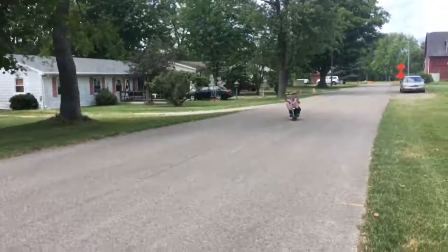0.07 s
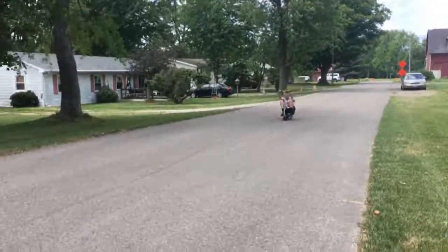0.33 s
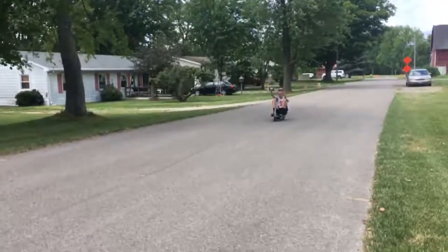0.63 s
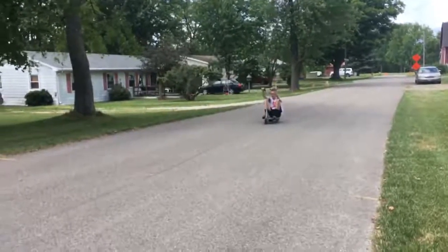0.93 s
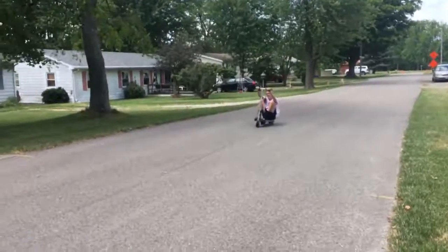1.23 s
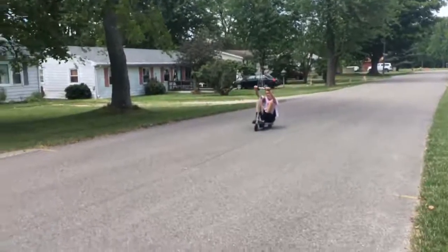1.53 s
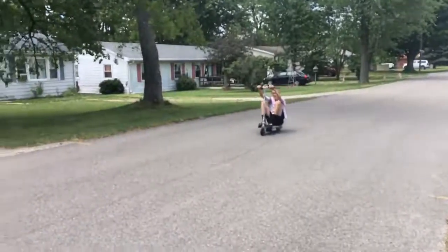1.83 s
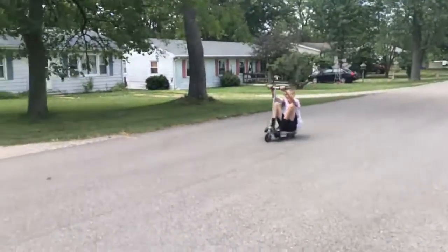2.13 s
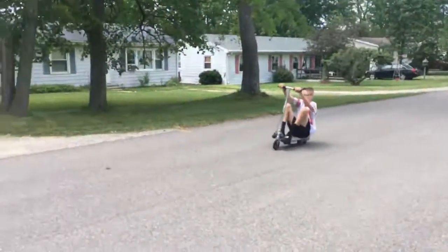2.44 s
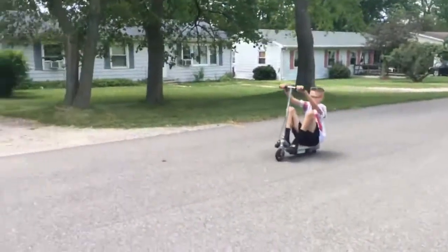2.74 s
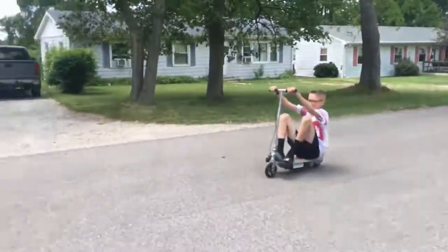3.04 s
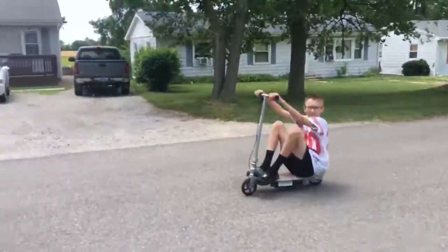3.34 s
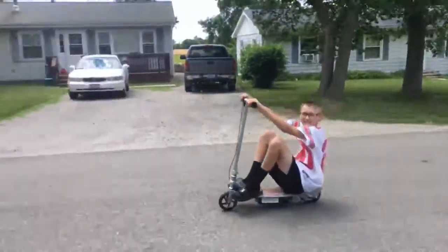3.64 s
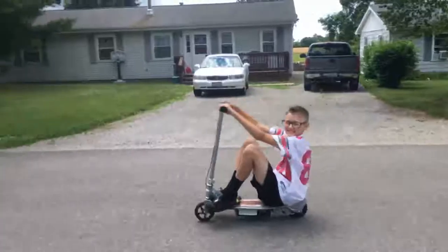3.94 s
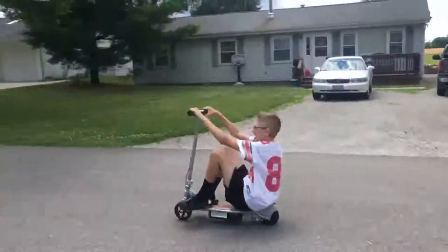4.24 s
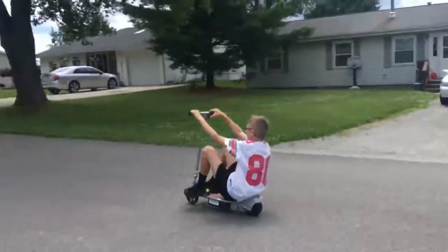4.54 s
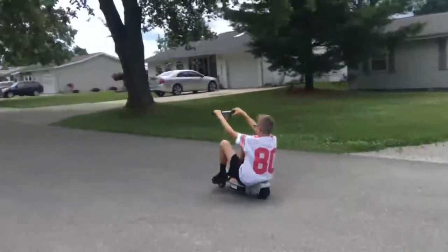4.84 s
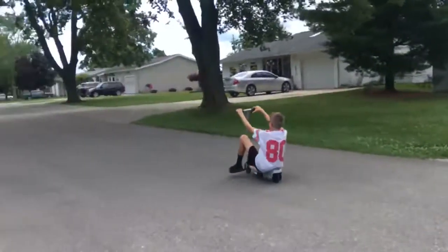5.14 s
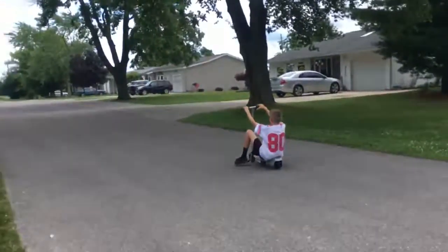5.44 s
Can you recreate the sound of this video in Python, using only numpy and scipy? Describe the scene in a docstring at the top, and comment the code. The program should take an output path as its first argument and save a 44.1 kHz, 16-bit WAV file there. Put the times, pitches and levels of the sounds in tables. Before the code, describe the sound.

A small electric scooter whines and hisses past on a paved street while gusty wind rumbles on the microphone.

```python
"""Electric scooter passing in the wind

A small chain-driven scooter rides along a quiet paved street, nearest at about 4.2 s. Its sprocket
whines at the tooth rate, the chain sizzles, the tyres hiss on the asphalt and the deck rings.
Gusts rumble and flutter on the microphone, and the hand-held recorder is bumped a few times."""
import sys
import numpy as np
from scipy import signal
from scipy.fft import rfft, irfft, next_fast_len
from scipy.io import wavfile
from scipy.ndimage import uniform_filter1d, map_coordinates

SR = 44100
rng = np.random.default_rng(int(sys.argv[2]) if len(sys.argv) > 2 else 0)


def to_wav(sig):
    """Store sig (one row per channel, or 1-D mono) as 16-bit WAV at the path in sys.argv[1].

    Samples outside -1..1 are clipped; the rate is SR.
    """
    pcm = np.clip(np.atleast_2d(sig), -1, 1) * 32767
    pcm = np.round(pcm).astype(np.int16)
    wavfile.write(sys.argv[1], SR, pcm.T)  # frames by channels


N = 250929
TIME = np.arange(N) / SR

# Tone of the street bed. Each row: frequency in Hz, relative level in dB.
STREET_EQ = [(100, -14), (400, 3), (650, 0), (950, 1.5), (1450, -1.5), (1800, -6.5), (2200, -0.5),
             (2800, -9), (4100, -5.5), (4900, -13.5), (6200, -8), (10000, -17), (15800, -15)]
# Finger bumps on the case. Each row: start in seconds, level in dB, seconds to fall 60 dB, low-pass in Hz.
BUMPS = [(0.912, -35, 0.071, 900), (1.093, -40, 0.038, 900), (1.25, -37, 0.55, 1500),
         (1.264, -26, 0.051, 3800), (4.582, -39, 0.059, 9000), (5.349, -33, 0.022, 11200),
         (5.358, -39.5, 0.21, 3970), (5.371, -40, .02, 12950)]
# Resonances of the case. Each row: frequency in Hz, width in Hz, level in dB.
CASE_MODES = [(657, 54, -2), (980, 380, 3), (1330, 120, -5), (1940, 210, -4.5), (2720, 880, -5.5),
              (3680, 320, -12), (6040, 1000, -4.5), (8100, 3000, -18), (12100, 10000, 7.5)]

# Tone of the large, middling and small eddies. Each row: frequency in Hz, relative level in dB.
RUMBLE_EQ = [(15, -44), (28, -10), (45, -1), (72, 1.5), (100, -3.5), (140, -10.5), (240, -39)]
BUFFET_EQ = [(65, -12), (115, -0.5), (175, 1.5), (270, -3.5), (370, -12.5), (500, -18), (700, -29),
             (1500, -49)]
FLUTTER_EQ = [(180, 3), (320, 4.5), (480, 3.5), (680, 0), (1050, -8), (1500, -17), (2100, -34), (3500, -58),
              (7000, -74)]
# Faster air sheds smaller eddies and lifts the rumble. Each row: time in seconds, shift in octaves.
RUMBLE_BEND = [(0, .2), (2.1, .4), (2.6, 0.017), (3.8, -.15), (5.3, .25)]
# The breeze between gusts. Each row: time in seconds, rumble level in dB, buffet level in dB.
BREEZE = [(0, -35.5, -39.5), (.55, -36.5, -35.5), (.95, -41, -40.5), (1.5, -34, -37), (2.35, -39, -28.5),
          (2.95, -39.5, -29), (3.4, -29, -25), (4.0, -28, -38), (4.22, -28, -43), (4.45, -20.5, -30.5),
          (4.8, -22, -30), (5.28, -30, -28), (5.69, -26.5, -23.5)]
# Gusts. Each row: start in seconds, length in seconds, then rumble, buffet and flutter levels in dB.
GUSTS = [(0.051, 0.027, -30, -31, -43), (0.384, 0.043, -32.5, -36.5, -60), (.71, 0.029, -33.5, -33, -52),
         (1.235, 0.05, -36, -27, -42), (1.669, 0.023, -29, -21, -46), (1.714, 0.031, -34, -22, -45),
         (1.845, 0.097, -19.5, -22, -40), (1.976, 0.13, -21.5, -21, -54), (2.148, 0.12, -31, -28, -49),
         (2.251, 0.21, -39, -40, -38.5), (2.484, 0.13, -26, -30, -32), (2.635, 0.055, -21.5, -33, -25),
         (2.749, .045, -24, -19, -37), (2.845, .033, -21, -27, -20), (2.894, 0.038, -44, -39, -32),
         (2.999, 0.16, -32, -32, -31), (3.201, 0.034, -37, -29, -29), (3.235, 0.028, -39, -24, -23),
         (3.276, 0.088, -25, -28, -21), (3.465, 0.072, -31, -21.5, -21), (3.554, .05, -22, -28, -22),
         (3.649, .02, -20.5, -19, -27.5), (3.751, 0.0144, -20.5, -22, -28),
         (3.895, 0.017, -14.5, -26.5, -39.5), (4.072, 0.069, -24, -36.5, -45),
         (4.27, 0.089, -15.5, -22, -36), (4.384, .045, -29, -20, -30.5), (4.541, 0.017, -24.5, -20, -26.5),
         (4.853, 0.0625, -16.5, -20, -36), (4.931, .026, -13.5, -13.5, -20),
         (4.976, 0.054, -24, -20, -29.5), (5.044, 0.061, -15, -16.5, -23), (5.119, 0.061, -13, -15, -18.5),
         (5.202, 0.044, -33, -19, -31), (5.318, 0.08, -24.5, -26.5, -36.5),
         (5.439, .07, -20.5, -24.5, -31.5), (5.519, 0.047, -25, -19, -24),
         (5.618, 0.042, -24, -22.5, -35.5)]
# Lone eddies on the microphone.
# Each row: start in seconds, level in dB, pitch in Hz, seconds to fall 60 dB.
SLAPS = [(.945, -26.5, 183, 0.089), (1.722, -13.5, 156, 0.073), (1.898, -12.5, 169, 0.11),
         (2.425, -13, 505, 0.017), (2.641, -11.5, 654, 0.019), (2.670, -4.5, 605, 0.0058),
         (2.852, -10.5, 502, 0.053), (3.052, -20, 493, 0.0075), (3.090, -10, 596, 0.009),
         (3.282, -3, 529.8, 0.0078), (3.325, -5, 1397, 0.0032), (3.4736, -1.5, 287, 0.013),
         (3.559, -11.5, 320, 0.18), (3.574, -1, 910, 0.0024), (3.699, -7, 448.3, 0.0096),
         (3.701, 0.5, 68, 0.082), (3.764, -6, 373, .01), (3.838, 1, 70, 0.051), (4.551, -1.5, 262, 0.011),
         (4.613, 2, 91.1, 0.02), (4.950, 1.5, 465, .011), (5.019, -1.5, 377.7, 0.0059),
         (5.056, -8, 915, 0.016), (5.157, -10, 79.73, 0.15), (5.166, -3.5, 1410, 0.0038),
         (5.390, -5, 297, 0.012), (5.445, -2, 463, 0.0034), (5.484, -10, 620, 0.01)]

# Tone of the tyres, the chain and its sideways beam. Each row: frequency in Hz, relative level in dB.
TYRE_EQ = [(200, 3.5), (420, 17), (560, -14), (850, 2.5), (1080, -1), (1300, -6), (1850, -5), (2200, 0.5),
           (2700, -12.5), (3300, -9), (3750, -17.5), (4800, -33), (8000, -52)]
CHAIN_EQ = [(3000, 0), (5000, -7), (5700, -4), (6200, 3), (6900, -2), (7800, -8), (8300, -9), (9800, 1.5),
            (10400, -6), (11000, 1.5), (12200, -1), (14000, -4.5), (15800, -12)]
CHAIN_BEAM_EQ = [(8000, -8), (12000, -32), (13500, 2), (14700, 4), (15800, -1)]
# Tyre and deck noise, riding with distance and road grain. Each row: time in seconds, level in dB.
ROLLING_FADER = [(0, -66), (1.0, -43.5), (2.1, -45), (2.4, -37), (2.8, -41), (3.3, -39.5), (3.7, -36.5),
                 (4.3, -34), (4.55, -46.5), (4.85, -36), (5.69, -54)]
# Brief swells and dips in the hiss. Each row: centre in seconds, half duration in seconds, gain in dB.
HISS_SWELLS = [(2.167, 0.056, -5.5), (4.25, 0.036, 0.5), (5.11, 0.056, 3), (5.27, 0.066, -2.5)]
# Ring of chain and sprocket. Each row: frequency in Hz, width in Hz, level in dB against the sizzle.
STEEL_MODES = [(5940, 87, -29.5), (7840, 220, -8.5), (8470, 130, -11), (9250, 270, -19)]
# Resonances of deck, motor and chain; each beams its own way and is heard over one stretch of the pass.
# Each row: frequency in Hz, width in Hz, level in dB, loudest moment and half duration in seconds.
SCOOTER_MODES = [(418, 28, -42, 3.777, 0.26), (1073, 180, -38, 4.2, 0.38), (1750, 24, -47, 4.61, 0.073),
                 (2150, 61, -57.5, 1.6, 0.6), (2228, 230, -43, 4.64, 0.4), (1080, 240, -47, 4.5, 0.58),
                 (2390, 200, -48, 2.4, 0.15), (2430, 110, -53, 3.14, 0.92), (1415, 84, -52.5, 3.1, 1),
                 (4320, 430, -55, 3.2, 0.85), (3270, 84, -58, 2.4, 0.14), (3773, 200, -51, 4.02, 0.2),
                 (3730, 98.5, -51.5, 4.53, 0.38), (4100, 200, -55, 1.67, 0.21), (4105, 98, -64, 5.92, 0.23),
                 (6100, 200, -52.5, 3.902, 0.54), (7380, 120, -52, 3.24, .35),
                 (7600, 138, -50.5, 4.97, 0.2), (8000, 98, -61, 1.14, 0.67), (11150, 350, -62, 3.8, .45)]
# The chain meeting the sprocket. Each row: time in seconds, teeth per second as heard.
TOOTH_RATE = [(0, 373), (.6, 371.5), (1.25, 367.5), (1.8, 368.5), (2.7, 376.5), (3.5, 371.5), (4.0, 369.7),
              (4.5, 370), (4.8, 367.5), (5.69, 366.5)]
# The whine swells and fades with the ground reflection. Each row: time in seconds, level in dB.
WHINE_FADER = [(0, -61), (.55, -49), (.8, -47.5), (1.0, -42), (1.2, -40.5), (1.5, -70), (2.1, -47),
               (3.0, -38.5), (3.6, -38), (3.95, -54), (4.1, -33.5), (4.35, -46), (4.55, -49), (4.75, -36),
               (5.1, -56), (5.69, -38)]
# Overtones of the whine. Each row: multiple of the tooth rate, level in dB against the rolling fader.
WHINE_OVERTONES = [(2, -19.5), (3, -24), (4, -21), (6, -26.5)]

# The path of the hiss: a straight line past the microphone.
SPEED_M_PER_S, NEAREST_S, DISTANCE_M = 4.0, 4.1, 2.5
RUMBLE, BUFFET, FLUTTER = range(3)  # order of the wind bands


def from_db(db):
    """Decibels to gain."""
    return 10 ** (np.asarray(db) / 20)


def unit_rms(x):
    """Scale to unit power."""
    return x / np.sqrt(np.mean(x ** 2) + 1e-20)


def automation(rows):
    """Join (seconds, value) rows with straight lines."""
    return np.interp(TIME, *np.transpose(rows))


def bell(centre_s, half_s):
    """A bell-shaped fade in and out, peaking at 1."""
    return np.exp(-.5 * ((TIME - centre_s) / half_s) ** 2)


def white():
    """Fresh white noise."""
    return rng.standard_normal(N)


def drift(rate_hz):
    """A smooth random wobble at unit power, mostly slower than `rate_hz`."""
    size = next_fast_len(N, True)
    hz = np.arange(size // 2 + 1) * SR / size
    return unit_rms(irfft(rfft(white(), size) / (1 + (hz / rate_hz) ** 2), size)[:N])


def equalise(x, curve):
    """Apply an EQ curve that rolls off 20 dB an octave past its ends; unit power out."""
    hz, db = np.transpose(curve)
    size = next_fast_len(N, True)
    octave, knots = np.log2(np.arange(size // 2 + 1) * SR / size + 1), np.log2(hz)
    beyond = np.abs(octave - np.clip(octave, knots[0], knots[-1]))
    gain = from_db(np.interp(octave, knots, db) - 20 * beyond)
    return unit_rms(irfft(rfft(x, size) * gain, size)[:N])


def level_out(x, window_s):
    """Ride the slow swells out of a noise and keep its fast lumps."""
    size = max(int(window_s * SR), 2)
    return x / np.sqrt(uniform_filter1d(uniform_filter1d(x ** 2, size), size) + 1e-9)


def varispeed(x, octaves):
    """Run a noise faster or slower, so its whole spectrum moves."""
    return np.interp(np.cumsum(2 ** octaves) % N, np.arange(N), x)


def resonate(x, hz, width_hz):
    """One resonance that passes white noise at unit power."""
    radius = np.exp(-np.pi * width_hz / SR)
    feedback = [1, -2 * radius * np.cos(2 * np.pi * hz / SR), radius ** 2]
    return np.sqrt((1 - radius ** 2) / 2) * signal.lfilter([1, 0, -1], feedback, x + 1e-18)


def street(level_db, sway_db):
    """Leaves and far traffic lay down a soft, even bed."""
    return from_db(level_db + sway_db * drift(7.4)) * equalise(white(), STREET_EQ)


def case_bumps(trim_db):
    """Short finger rubs ring the recorder's case; some are dull thuds, others bright clicks."""
    force, grain = np.zeros(N), white()
    for start_s, db, t60, top_hz in BUMPS:
        span = slice(int(start_s * SR), int((start_s + 2 * t60) * SR))
        age = np.arange(len(force[span])) / SR
        rub = grain[span] * from_db(db - 60 * age / t60)
        force[span] += signal.lfilter(*signal.butter(1, top_hz, fs=SR), rub)
    return sum(from_db(db + trim_db) * resonate(force, hz, width) for hz, width, db in CASE_MODES)


def breeze(band, lull_db):
    """One band's envelope in light air: separate puffs with lulls between."""
    level_db = automation([(s, levels[band]) for s, *levels in BREEZE])
    puffs = unit_rms(from_db(lull_db * np.tanh(2 * drift(14))))
    return from_db(level_db) * puffs


def gusts(band, attack_s, release_s):
    """One band's envelope in the gusts: each rises, holds and dies away."""
    power = np.zeros(N)
    for start_s, length_s, *levels in GUSTS:
        span = slice(int(start_s * SR), int((start_s + length_s + 10 * release_s) * SR))
        age = TIME[span] - start_s
        attack = np.clip(age / attack_s, 0, 1)
        release = np.exp(-np.maximum(age - length_s, 0) / release_s)
        power[span] += (from_db(levels[band]) * attack * release) ** 2
    return np.sqrt(power)


def eddies(per_s, spread_db):
    """Pressure jolts of random sign and size at random moments."""
    return (rng.random(N) < per_s / SR) * rng.choice([-1, 1], N) * from_db(spread_db * white())


def wind(rumble_db, buffet_db):
    """Large eddies rumble on the microphone port; smaller ones buffet it in puffs."""
    rumble_gain = np.hypot(breeze(RUMBLE, lull_db=3.0), gusts(RUMBLE, attack_s=.012, release_s=.012))
    buffet_gain = np.hypot(breeze(BUFFET, lull_db=6.5), gusts(BUFFET, attack_s=.0078, release_s=.01))
    rumble = varispeed(equalise(white(), RUMBLE_EQ), automation(RUMBLE_BEND))
    buffet = equalise(eddies(per_s=400, spread_db=3.06), BUFFET_EQ)
    return (from_db(rumble_db) * rumble_gain * level_out(rumble, window_s=.081)
            + from_db(buffet_db) * buffet_gain * level_out(buffet, window_s=.037))


def wind_flutter(trim_db, rise_octaves, wander_octaves, pivot_db, flicker_db):
    """Strong gusts break into small eddies; the harder they blow, the higher they flutter."""
    gust = gusts(FLUTTER, attack_s=.009, release_s=.018)
    doublings = np.clip(np.log2(gust / from_db(pivot_db) + 1e-6), -2, 2)
    octaves = rise_octaves * doublings + wander_octaves * drift(40.04)
    jolts = varispeed(equalise(eddies(per_s=750, spread_db=2.55), FLUTTER_EQ), octaves)
    return from_db(trim_db + flicker_db * drift(63)) * gust * level_out(jolts, window_s=.045)


def wind_slaps(top_hz):
    """A lone eddy kicks the pressure, which swings back and settles."""
    slaps = np.zeros(N)
    for start_s, db, hz, t60 in SLAPS:
        start = int(start_s * SR)
        age = np.arange(min(int(2 * t60 * SR), N - start)) / SR
        slaps[start:start + len(age)] += from_db(db - 60 * age / t60) * np.sin(2 * np.pi * hz * age)
    return signal.sosfilt(signal.butter(2, top_hz, fs=SR, output="sos"), slaps + 1e-18)


def distance_db(nearest_s):
    """The pass-by fade: 0 dB at the nearest point, falling with distance."""
    along_m = SPEED_M_PER_S * (TIME - nearest_s)
    return 20 * np.log10(DISTANCE_M / np.hypot(DISTANCE_M, along_m))


def doppler(x):
    """The changing travel time bends the pitch down as the scooter passes."""
    range_m = np.hypot(DISTANCE_M, SPEED_M_PER_S * (TIME - NEAREST_S))
    delay_s = (range_m - DISTANCE_M) / 343
    return map_coordinates(x, [(TIME - delay_s) * SR], order=3, mode="mirror")


def tooth_phase(wobble_hz):
    """Phase of the meshing teeth; the slack chain makes it waver."""
    return 2 * np.pi * np.cumsum(automation(TOOTH_RATE) + wobble_hz * drift(7.8)) / SR


def hiss_movement(waver_db):
    """A gain that keeps the hiss wavering, with a few brief swells and dips."""
    swells_db = sum(db * bell(centre_s, half_s) for centre_s, half_s, db in HISS_SWELLS)
    return from_db(waver_db * drift(10) + swells_db)


def tyres(grit_db):
    """Small wheels on coarse asphalt shake the deck with a gritty hiss."""
    grit = white() * from_db(grit_db * drift(45))
    return from_db(automation(ROLLING_FADER)) * equalise(grit, TYRE_EQ)


def chain(phase, pulsing, grain_db, sizzle_db, beam_db):
    """Rollers land with tiny hissing ticks that ring the steel; the highest treble beams sideways."""
    ticks = unit_rms(white() * np.exp(pulsing * np.cos(phase)) * from_db(grain_db * drift(140)))
    steel = sum(from_db(db) * resonate(ticks, hz, width) for hz, width, db in STEEL_MODES)
    sizzle_gain = from_db(sizzle_db + 0.69 * distance_db(NEAREST_S))  # a broad, gentle fade
    beam_gain = from_db(beam_db + 3.2 * distance_db(nearest_s=4.13))  # a narrow, quick sweep
    return sizzle_gain * (equalise(ticks, CHAIN_EQ) + steel) + beam_gain * equalise(ticks, CHAIN_BEAM_EQ)


def scooter_ring(flicker_db, rasp):
    """Road and chain shake the modes at the tooth rate; their beams sweep past one after another."""
    teeth = unit_rms(np.exp(rasp * np.cos(tooth_phase(wobble_hz=0.84))))
    ring = np.zeros(N)
    for hz, width, db, loudest_s, half_s in SCOOTER_MODES:
        ring += from_db(db) * bell(loudest_s, half_s) * resonate(white() * teeth, hz, width)
    return ring * from_db(flicker_db * drift(6.1))


def sprocket_whine(phase, overtone_waver_db):
    """Meshing teeth sing a tone and its overtones, each wavering in level by itself."""
    tone = from_db(automation(WHINE_FADER) + 0.27 * drift(2.7)) * np.sin(phase)
    overtones = sum(from_db(db + overtone_waver_db * drift(7.7)) * np.sin(multiple * phase)
                    for multiple, db in WHINE_OVERTONES)
    return np.sqrt(2) * (tone + from_db(automation(ROLLING_FADER)) * overtones)


def scene():
    """The mono mix: scooter, wind and handling noise over the street bed."""
    phase = tooth_phase(wobble_hz=1.26)
    hiss = chain(phase, pulsing=0.084, grain_db=1.65, sizzle_db=-43.5, beam_db=-40) + tyres(grit_db=2.75)
    scooter = doppler(hiss * hiss_movement(waver_db=.5))
    scooter += sprocket_whine(phase, overtone_waver_db=5.0) + scooter_ring(flicker_db=2.06, rasp=0.46)
    air = wind(rumble_db=1.1, buffet_db=-0.5) + wind_slaps(top_hz=1827)
    air += wind_flutter(trim_db=1.5, rise_octaves=.15, wander_octaves=.12, pivot_db=-27, flicker_db=1.7)
    return (scooter + air + case_bumps(trim_db=0.5) + street(level_db=-43.5, sway_db=0.82))[None]


def record(dry, low_cut_hz=32, ceiling=.73, high_cut_hz=15720):
    """Cut the sub-bass, soft-clip the strongest gusts and take off the very top."""
    dry = signal.sosfilt(signal.butter(5, low_cut_hz, "high", fs=SR, output="sos"), dry)
    rounded = dry / (1 + (dry / ceiling) ** 6) ** (1 / 6)
    return signal.sosfilt(signal.ellip(14, .1, 90, high_cut_hz, fs=SR, output="sos"), rounded)


dry = scene()
out = record(dry)
to_wav(out)
```